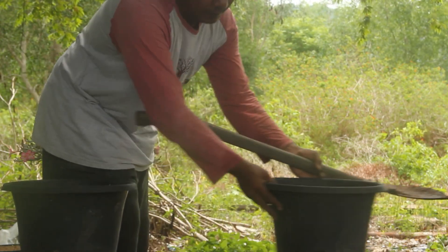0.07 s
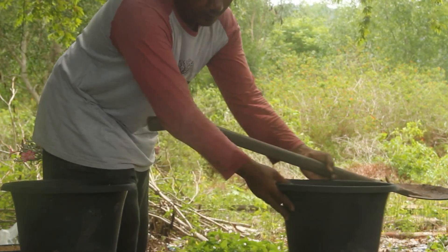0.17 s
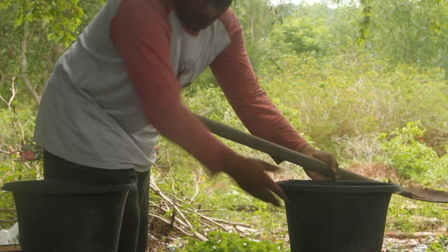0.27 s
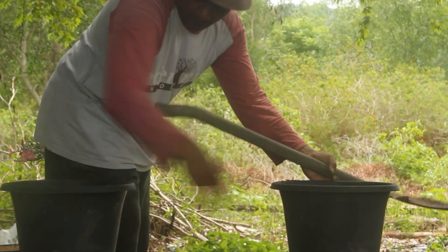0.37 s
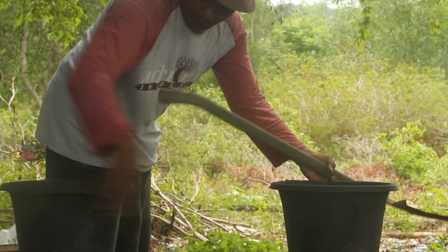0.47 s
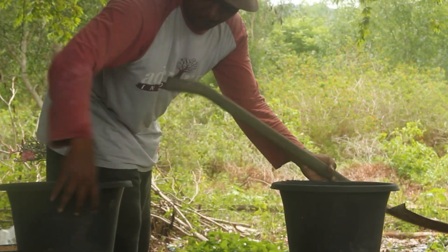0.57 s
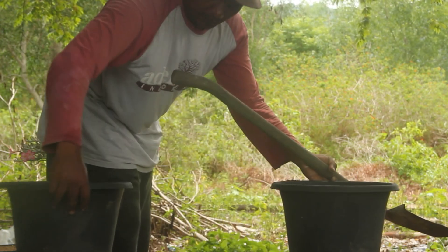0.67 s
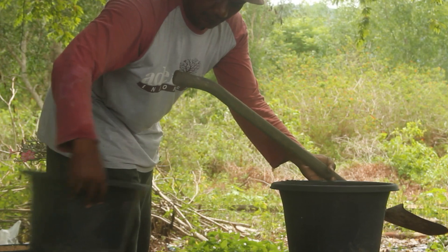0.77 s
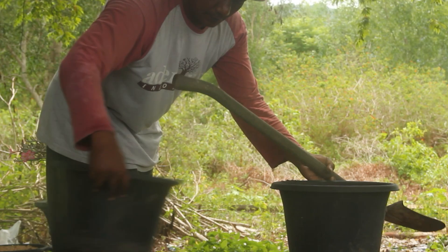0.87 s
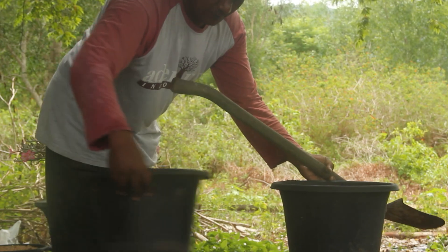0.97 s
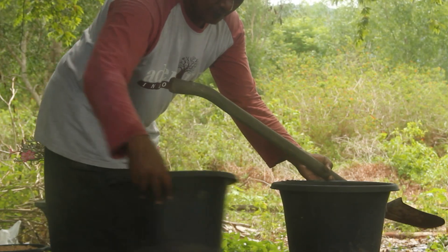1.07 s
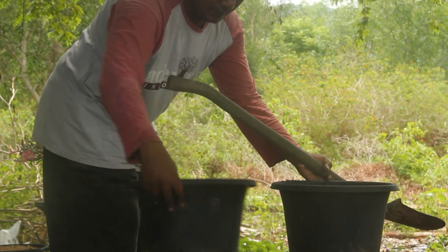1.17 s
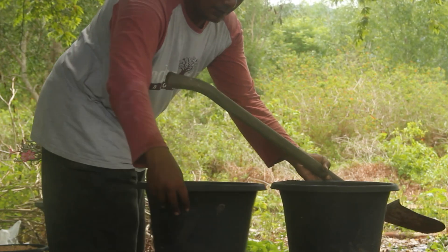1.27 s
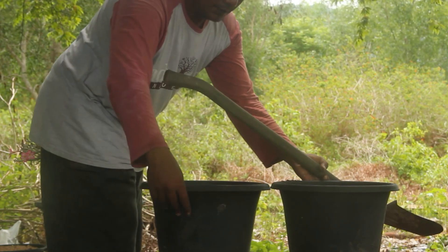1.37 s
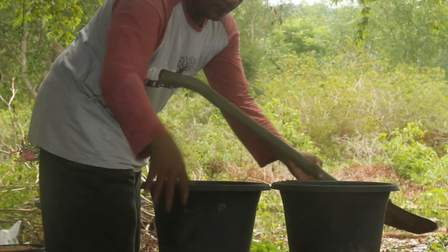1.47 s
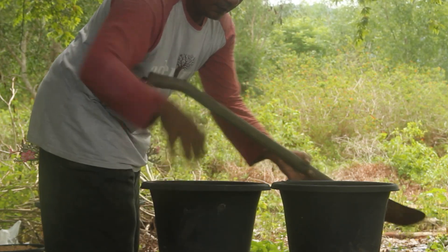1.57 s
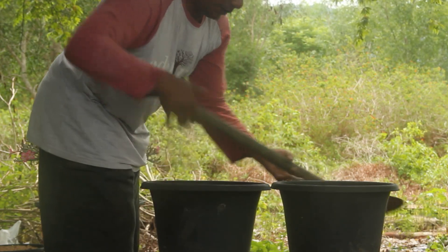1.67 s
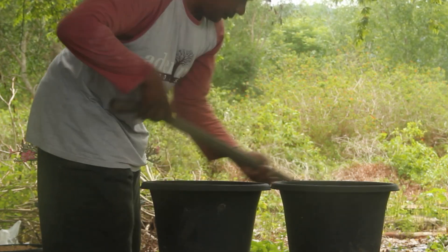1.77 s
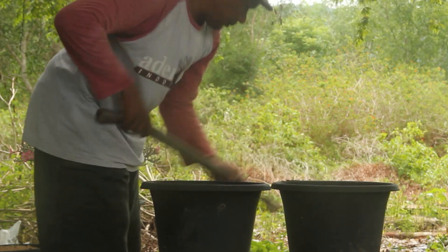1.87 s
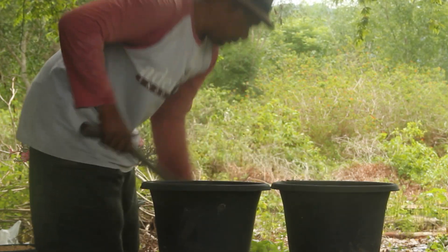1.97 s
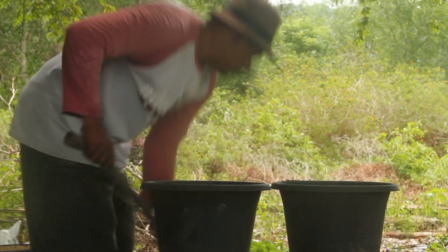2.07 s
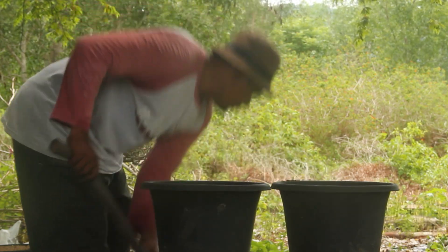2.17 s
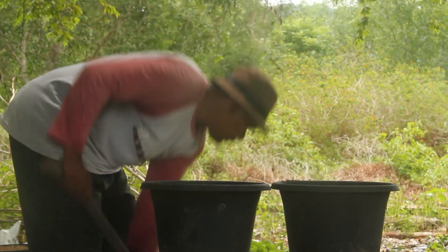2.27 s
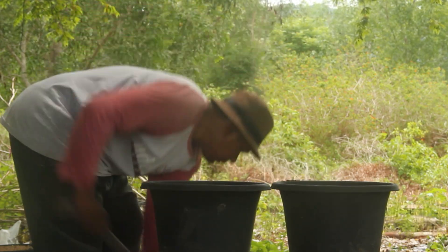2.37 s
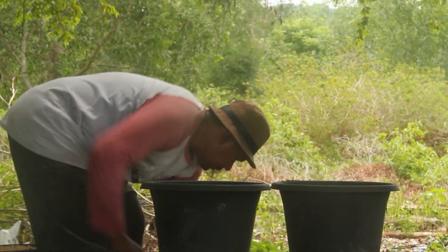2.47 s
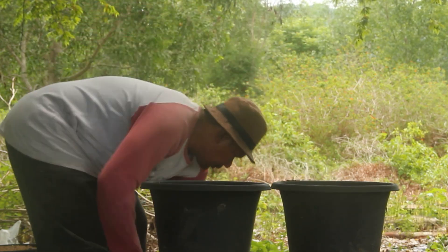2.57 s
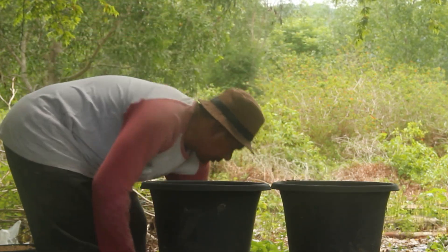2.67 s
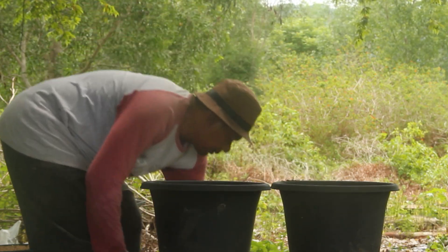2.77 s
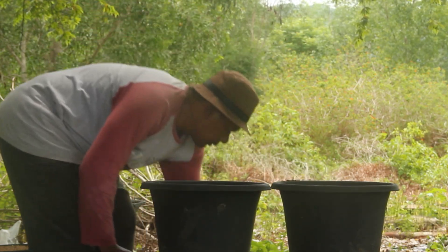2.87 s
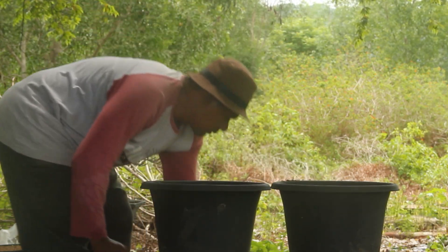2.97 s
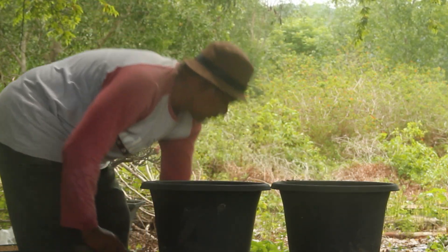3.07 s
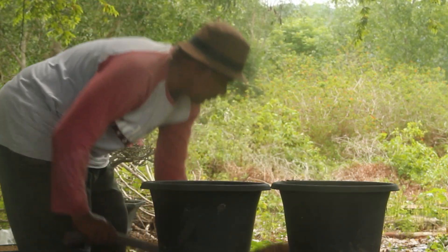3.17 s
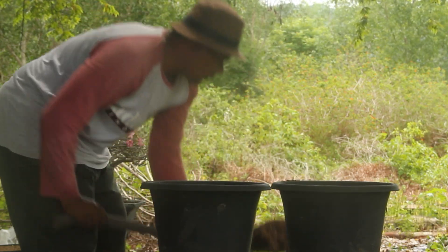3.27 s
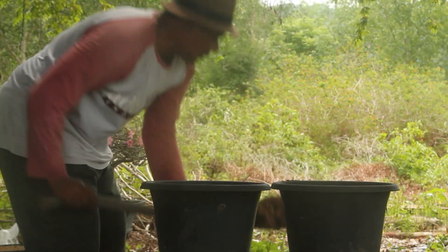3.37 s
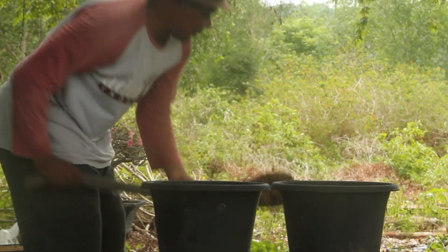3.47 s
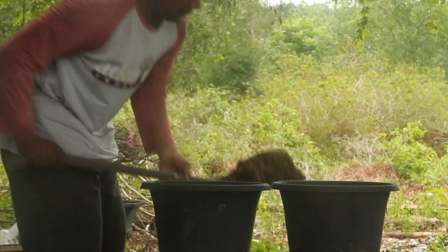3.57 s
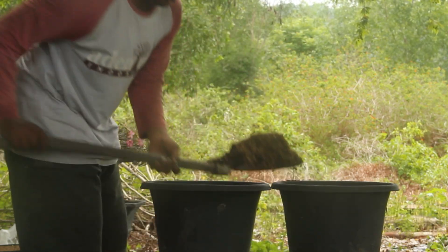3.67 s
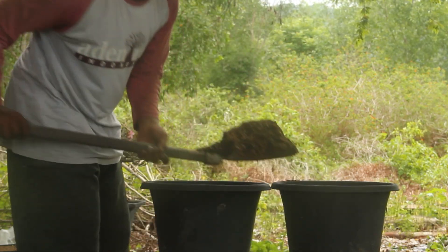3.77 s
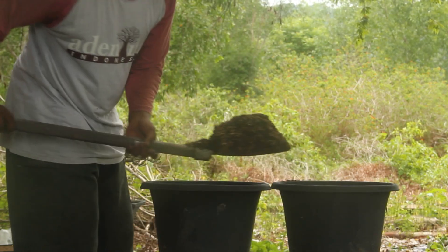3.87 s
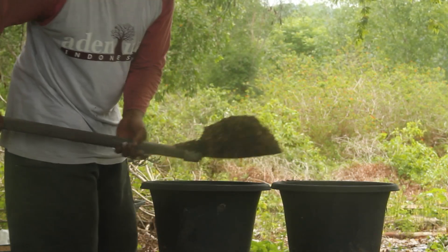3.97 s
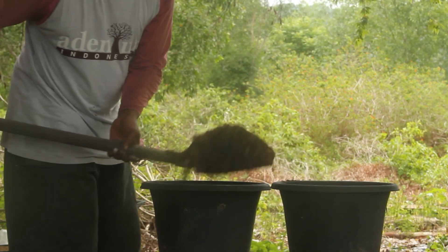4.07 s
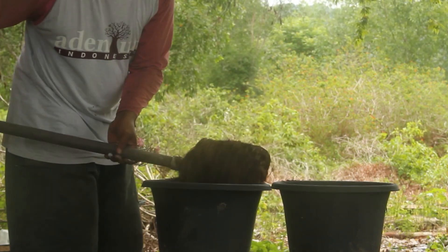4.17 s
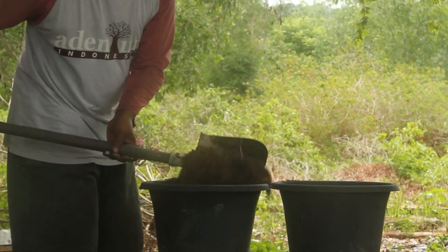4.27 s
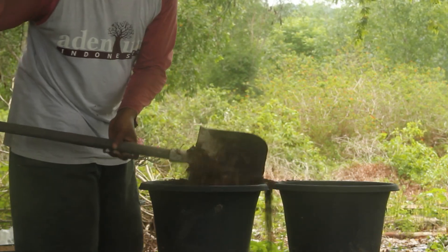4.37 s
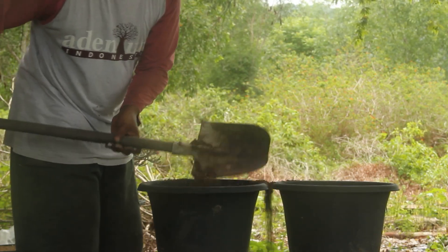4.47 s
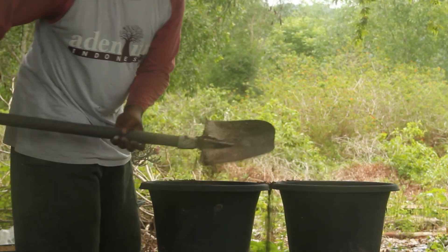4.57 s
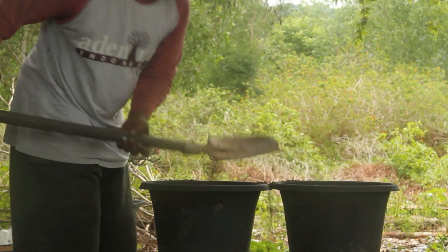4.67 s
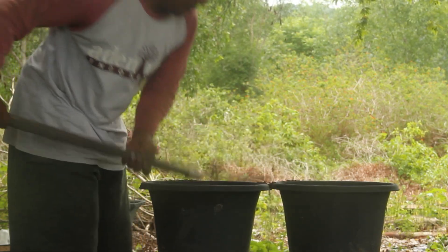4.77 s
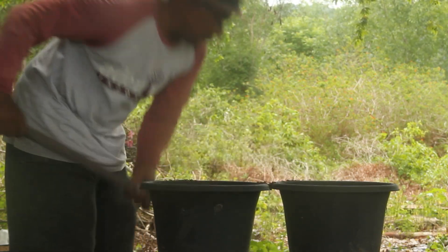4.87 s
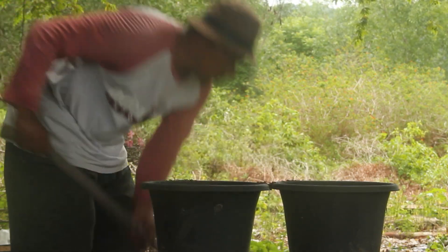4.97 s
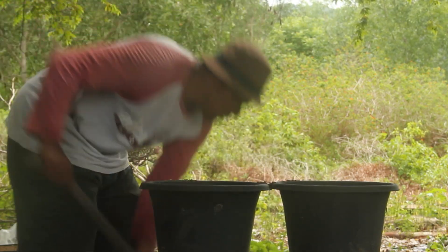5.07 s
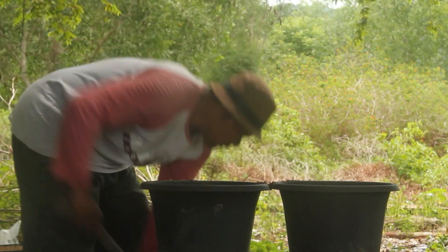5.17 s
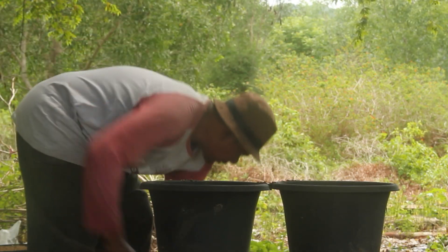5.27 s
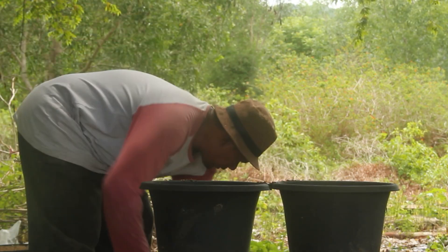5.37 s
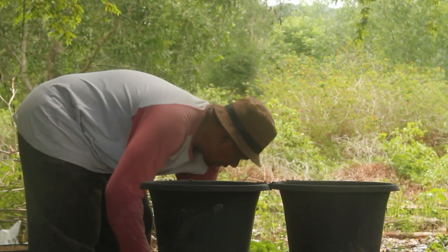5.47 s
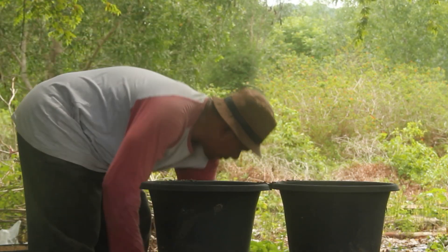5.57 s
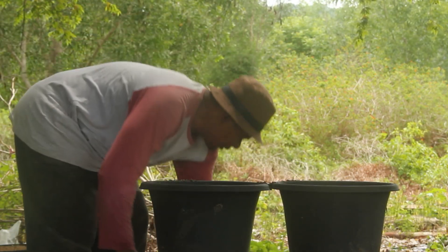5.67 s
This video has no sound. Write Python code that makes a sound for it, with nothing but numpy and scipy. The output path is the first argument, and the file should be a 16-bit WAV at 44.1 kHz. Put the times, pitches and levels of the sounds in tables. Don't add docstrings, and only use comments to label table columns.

```python
import sys
import numpy as np
from scipy import signal
from scipy.io import wavfile
from scipy.ndimage import uniform_filter1d

SR = 44100
rng = np.random.default_rng(int(sys.argv[2]) if len(sys.argv) > 2 else 0)


def pcm_store(signal):
    levels = np.round(np.clip(np.atleast_2d(signal), -1, 1) * 32767)
    wavfile.write(sys.argv[1], SR, levels.astype(np.int16).T)


def linear_from_db(decibels):
    return 10 ** (np.asarray(decibels, float) / 20)


N = 251811
JOLT, PUSH, WITHDRAW = 1.03, 3.65, 5.5


def evened(x):
    return x / np.sqrt(np.mean(x ** 2) + 1e-20)


def read(points, hz):
    f, value = np.transpose(points)
    return np.interp(np.log(hz + 1), np.log(f + 1), value)


def add(mix, s, sound):
    part = mix[round(s * SR):][:len(sound)]
    part += sound[:len(part)]


def causal(gain, size=4096):
    log = np.log(np.maximum(np.r_[gain, gain[-2:0:-1]], 1e-5))
    return np.fft.ifft(np.exp(log - 1j * signal.hilbert(log).imag)).real[:size]


def resonate(x, hz, width_hz):
    turn = np.exp(2j * np.pi * np.cumsum(hz * np.ones(len(x))) / SR)
    r = np.exp(-np.pi * width_hz / SR)
    smooth = signal.lfilter([1 - r], [1, -r], x / turn + 1e-18)
    return 2 * (turn * smooth).real


def wander(length_s):
    width = max(int(length_s * SR), 2)
    drift = uniform_filter1d(rng.standard_normal(N), width)
    return evened(uniform_filter1d(drift, width))


def grit(per_s, spread_db, clump_db, sand):
    struck = rng.random(N) < per_s / SR
    size = np.minimum(rng.exponential(1, N), 3.0)
    sign = rng.choice([-1., 1.], N)
    clicks = evened(sign * linear_from_db(spread_db * size) * struck)
    hiss = sand * rng.standard_normal(N)
    return (clicks + hiss) * linear_from_db(clump_db * wander(0.0032))


def swell(start, attack, fade, db, curve):
    t = np.arange(0, attack + 3 * fade, 1 / SR)
    rising_db = 10 * (1 - t / attack)
    fading_db = 20 * (np.maximum(t - attack, 0) / fade) ** curve
    lost_db = np.where(t < attack, rising_db, fading_db)
    start_ramp = np.minimum(1, t / (0.13 * attack))
    return (linear_from_db(db - lost_db) * start_ramp) ** 2, lost_db


def effort(rows, curve, sand_db, sand_lag):
    power = np.zeros((3, N))
    for start, attack, fade, force_db, weight_db in rows:
        push, lost_db = swell(start, attack, fade, force_db, curve)
        for voice, db in zip(power, [0, weight_db, sand_db - sand_lag * lost_db]):
            add(voice, start, push * linear_from_db(db) ** 2)
    return power


def strokes(power, drive, modes, colour, ring_db):
    hz = np.fft.rfftfreq(8192, 1 / SR)
    peaks = sum(linear_from_db(min(db, 5) / 2) ** 2 / (1 + ((hz - f) / (w / 2)) ** 2) for f, w, db in modes)
    body = linear_from_db(read(colour, hz)) * np.sqrt(1 + linear_from_db(ring_db) ** 2 * peaks)
    low = 1 / (1 + (hz / 1300) ** 8)
    high = 1 / (1 + (5000 / (hz + 1)) ** 8)
    out = np.zeros(N)
    for share, level in zip([1 - low - high, low, high], np.sqrt(power)):
        ring = causal(body * np.sqrt(np.maximum(share, 0)))
        out += signal.oaconvolve(evened(drive) * level, ring / np.linalg.norm(ring))[:N]
    return out


# (start [s], attack [s], time to fade 20 dB [s], grit force [dB], weight of load [dB])
DRAGS = [(0.0, 0.00041, 0.06, -26.5, -6.5), (.036, 0.03, 0.17, -35.5, -6), (.07, .02, 0.15, -40, -1),
         (.113, .004, 0.2, -37.5, 3.5), (.434, 0.04, 0.08, -37, -20), (.525, 0.032, 0.05, -40, -1),
         (.575, 0.012, 0.01, -30.5, -19), (.6, .012, .15, -42, -6), (.651, 0.019, 0.05, -31, -28),
         (.7, 0.025, 0.25, -54, 7), (1.039, 0.0087, 0.06, -39.5, 3), (1.159, 0.0089, 0.08, -36.5, -2),
         (1.19, .015, 0.25, -39.5, -5), (1.243, 0.072, 0.07, -31.5, -3), (1.32, 0.074, 0.11, -34, -26)]
RIM_KNOCK = [(.177, 0.0098, 0.051, -28, -14)]
# (pitch [Hz], width [Hz], level [dB])
EMPTY_POT = [(980, 33, -12), (2220, 530, -5), (6260, 200, -9), (10200, 140, -13), (13500, 140, -8)]
STIFF_RIM = [(2640, 80, -4), (3470, 210, 8), (5950, 160, 1), (9400, 170, -6), (10100, 150, 4),
             (11800, 120, -10), (12600, 250, -11), (13600, 100, -9)]
# (pitch [Hz], level [dB per Hz])
DRAG_COLOUR = [(88, -40), (150, -11), (481, -2), (914, 0), (1490, -7), (8380, -6.5), (9980, -6.5),
               (15600, -7)]


def drag_pots():
    handling = grit(4000., 2.5, 1.5, 0.76)
    drags = effort(DRAGS, JOLT, sand_db=-1.5, sand_lag=0.45)
    knock = effort(RIM_KNOCK, JOLT, sand_db=5.0, sand_lag=0.14)
    walls = strokes(drags, handling, EMPTY_POT, DRAG_COLOUR, ring_db=4.5)
    return walls + strokes(knock, handling, STIFF_RIM, DRAG_COLOUR, ring_db=12.0)


# (start [s], swell [s], time to fade 20 dB [s], level [dB])
CRUMBS = [(0, .001, 0.2751, -33.5), (.2, 0.15, 0.9, -52.5), (1.55, 0.57, 7, -53), (3.5, 0.96, 6.5, -62),
          (4.05, 0.085, 0.77, -42), (4.4, .5, -0.06, -47.5), (5.0, 0.064, 1.5, -53), (4.76, .06, .08, -50),
          (4.87, .02, .14, -49)]
DUST = [(0, .001, 0.25, -52), (.05, 0.021, 0.046, -42), (.43, 0.027, 0.11, -45), (.57, .01, 0.056, -40.5),
        (1.043, .003, 0.04, -44), (.66, .004, .04, -42), (4.8, .04, .05, -56), (1.159, .002, .025, -47),
        (1.29, .012, .03, -39), (1.5, 0.94, .8, -65), (2.443, .002, 0.019, -19), (5.187, .006, .12, -27),
        (5.17, .01, .02, -52), (4.15, .002, 0.014, -40), (2.7, 0.37, 1.1, -52.5), (3.5, 1.3, 0.44, -55),
        (3.97, 0.032, 0.034, -40.5), (4.28, 0.028, .2, -40), (5.4, .31, .5, -58)]
# (pitch [Hz], level [dB per Hz])
SIFT_COLOUR = [
    [(700, -27), (2000, -3), (5000, -1), (9000, -10), (16000, -16.5)],
    [(2000, -25), (7000, -3.5), (12000, -1), (16000, -2.5)],
]


def sift():
    grains = grit(3000., 3.4, 0.68, 1.0) * linear_from_db(1.8 * wander(0.033))
    out = np.zeros(N)
    for rows, rest_db, colour in zip([CRUMBS, DUST], [-86, -75], SIFT_COLOUR):
        power = np.full(N, linear_from_db(rest_db) ** 2)
        for row in rows:
            add(power, row[0], swell(*row, curve=2.3)[0])
        ring = causal(linear_from_db(read(colour, np.fft.rfftfreq(2048, 1 / SR))), size=512)
        out += evened(signal.oaconvolve(grains, ring)[:N]) * np.sqrt(power)
    return out


# (pitch [Hz], level [dB per Hz])
HUM_COLOUR = [(25, -7), (59, -6.5), (113, -2.5), (458, -6.5), (851, -10.5), (1140, -14), (3020, -22),
              (15600, -38.5)]


def hum():
    frames, hz = N // 256 + 5, np.fft.rfftfreq(1024, 1 / SR)
    a, b, patches = rng.standard_normal((frames, 513, 3)).T
    patches = evened(uniform_filter1d(uniform_filter1d(patches, 8, 0), 14, 1))
    z = (a + 1j * b) * linear_from_db(read(HUM_COLOUR, hz)[:, None] + 1.1 * patches)
    return linear_from_db(-44) * evened(signal.istft(z, nperseg=1024, noverlap=768)[1][:N])


# (time [s], peak level [dB], pitch [Hz], time to ring down 60 dB [s])
STONES = [(.793, -32, 2100, .012), (2.075, -32.5, 1960, 0.0082), (2.162, -21, 2900, 0.009),
          (2.163, -26, 1900, 0.01), (2.183, -41, 13500, .004), (2.227, -34.5, 7000, .002),
          (2.333, -5, 2640, .004), (3.96, -27, 1260, 0.031), (4.153, -7, 570, 0.0045),
          (4.166, -14.5, 1160, 0.032), (4.319, -5, 4200, 0.002), (1.966, -40, 3200, .008),
          (5.193, -4, 3900, .003), (5.219, -8, 1500, .004), (5.326, -8, 3000, .004), (5.35, -9, 2100, .005),
          (2.484, -12, 650, .015), (.117, -21, 1000, .012), (1.246, -25, 1170, .012),
          (2.351, -7, 1700, .005), (2.459, -8, 750, .012), (4.353, -11.5, 1060, 0.017),
          (4.377, -12.5, 1290, 0.015), (5.194, -15, 2040, .0058), (5.222, -15, 3190, .009),
          (5.494, -23, 2840, 0.0054)]
SNAPS = [(.007, -39, 2360, .0074), (.056, -21, 13500, 0.006), (.043, -30, 4000, .003),
         (.18, -22, 10200, .005), (.536, -34, 6000, .004), (.666, -25, 12200, .004),
         (.065, -21.5, 3200, .011), (.437, -38, 12000, 0.003), (.58, -35, 12000, .01),
         (.46, -36, 2000, .008), (.654, -23, 3600, .006), (1.163, -17, 2220, 0.0041),
         (1.04, -32, 14000, .003), (1.048, -20, 13900, .004), (1.164, -24, 14500, .006),
         (1.246, -32, 10100, .003), (1.279, -32, 7000, .003), (1.288, -28, 10500, .003),
         (1.305, -23, 8040, .005), (1.306, -26, 13000, .004), (2.637, -17, 2750, .006),
         (2.137, -40, 11000, 0.0031), (2.304, -13.5, 7900, 0.01), (2.446, -7.5, 9050, 0.0035),
         (3.655, -41, 12000, .004), (3.8, -47, 3000, .005), (4.185, -12.5, 2440, 0.0067),
         (5.437, -11, 2950, 0.012), (5.522, -26, 2900, .005), (5.588, -29, 1800, 0.0072)]


def ticks():
    out, t = np.zeros(N), np.arange(1500) / SR
    for rows, crack_db in [(STONES, -18), (SNAPS, -6.5)]:
        noise = rng.standard_normal((len(rows), len(t)))
        for (s, db, hz, t60), n in zip(rows, noise):
            ring = np.sin(2 * np.pi * hz * t) * linear_from_db(-60 * t / max(t60, .002))
            crack = (n + 2.7 * (t == 0)) * linear_from_db(crack_db - 60 * t / 0.0015)
            add(out, s, linear_from_db(db) * (ring + crack))
    return out


# (start [s], length [s], pitch [Hz], width [Hz], level
# [dB])
RUBS = [(.116, 0.026, 1000, 400, -24), (1.042, 0.051, 200, 150, -35.5), (1.166, 0.026, 2250, 600, -30.5),
        (1.245, 0.026, 1170, 350, -27), (1.283, 0.031, 1150, 400, -31), (1.32, .11, 8400, 400, -42),
        (1.33, 0.031, 4800, 500, -43), (1.36, 0.075, 4700, 1200, -30), (2.303, 0.022, 5200, 204, -20),
        (2.332, 0.06, 2630, 90, -15), (2.35, 0.03, 1300, 150, -19), (2.375, 0.046, 403, 122, -20.5),
        (2.455, 0.025, 720, 200, -21), (4.148, 0.026, 187, 102, -23), (4.156, 0.015, 1160, 200, -25),
        (4.261, 0.11, 330, 119, -29.5), (4.25, .06, 1120, 402, -27), (4.339, 0.035, 1170, 600, -24),
        (5.189, 0.05, 5280, 300, -19), (5.226, 0.085, 3540, 400, -20), (5.208, 0.03, 820, 120, -19),
        (1.325, .05, 4700, 300, -29), (1.315, .025, 3950, 250, -29), (1.41, .08, 5400, 400, -44),
        (4.27, .07, 190, 80, -31), (1.335, .04, 4350, 300, -27), (1.352, .03, 3850, 300, -28),
        (1.362, .028, 3150, 300, -26), (1.31, .025, 1150, 250, -31), (4.276, .02, 300, 150, -24),
        (4.184, .018, 350, 200, -28), (4.32, .03, 2900, 600, -28), (.178, .04, 10200, 300, -30),
        (.194, .045, 6100, 250, -32), (.058, .035, 12800, 900, -34), (.085, .03, 3300, 400, -33),
        (2.303, .03, 2550, 250, -26), (2.303, .03, 1500, 300, -28), (2.35, .05, 1680, 90, -21),
               (2.38, .03, 1270, 90, -19), (2.39, .06, 560, 90, -23), (2.4, .06, 2110, 60, -27),
               (2.44, .05, 3460, 100, -24), (2.478, .05, 600, 150, -21), (2.505, .03, 830, 150, -27),
               (2.5, .025, 2900, 300, -25), (2.43, .05, 330, 120, -24), (2.445, .02, 5300, 500, -21),
               (2.375, .04, 2500, 500, -21), (2.53, .06, 3000, 700, -24), (2.55, .05, 760, 150, -26),
               (2.62, .045, 2800, 500, -30), (5.19, .02, 3900, 250, -18), (5.19, .04, 1980, 120, -20),
               (5.19, .02, 800, 250, -20), (5.212, .02, 2900, 300, -20), (5.215, .02, 420, 120, -26),
               (5.24, .04, 5370, 150, -23), (5.23, .07, 1680, 70, -24), (5.275, .045, 830, 120, -20),
               (5.275, .04, 2850, 250, -20), (5.3, .06, 3600, 400, -19), (5.33, .06, 2110, 200, -21),
               (5.333, .02, 834, 120, -23), (5.37, .03, 850, 120, -24), (5.408, .025, 830, 150, -30),
               (5.188, .05, 7700, 500, -23), (5.435, .01, 9200, 700, -29), (5.39, .04, 2110, 150, -28),
               (5.33, .05, 4360, 150, -26), (4.436, .04, 2700, 200, -20), (4.457, .022, 2200, 200, -24),
               (4.436, .03, 3750, 150, -23)]


def rubs():
    out, rows = np.zeros(N), RUBS
    noise = rng.standard_normal((len(rows), 8000))
    for (s, length, hz, width_hz, db), n in zip(rows, noise):
        u = np.arange(0, length, 1 / SR) / length
        tone = evened(resonate(resonate(n, hz, width_hz), hz, width_hz))[2000:][:len(u)]
        swing = np.sqrt(uniform_filter1d(tone ** 2, size=300) + 1e-9)
        tone = tone / (0.4 + swing) * 1.4
        ends = np.minimum(1, np.minimum(u / 0.07, (1 - u) / 0.19))
        add(out, s, linear_from_db(db - 11.2 * u) * ends * tone)
    return out


# (start [s], length [s], start pitch [Hz], end pitch [Hz], level [dB])
GLIDES = [(.69, .06, 3050, 2780, -49), (.735, .095, 2780, 2680, -51), (2.063, .035, 2300, 2450, -53),
          (2.095, .012, 2550, 2850, -52), (2.105, .022, 2850, 2350, -52), (2.005, .025, 2300, 2550, -57),
          (2.025, .025, 2800, 2400, -57), (3.01, .045, 2850, 2950, -53), (3.05, .06, 2700, 2400, -55),
          (.32, .11, 7250, 6850, -59), (.3, .13, 5100, 5200, -63), (.27, .17, 11600, 11950, -65),
          (.27, .065, 13700, 14400, -63)]
# (time [s], pitch [Hz], level [dB])
WARBLE = [(1.52, 2400, -57), (1.572, 2900, -48), (1.598, 1680, -54), (1.615, 2350, -47), (1.645, 2620, -48),
          (1.665, 2350, -62), (1.685, 2500, -53), (1.715, 2570, -60), (1.79, 2500, -62)]


def whistles():
    out, quaver, flutter_db = np.zeros(N), 0.013 * wander(0.0027), 3.5 * wander(.008)
    glides = [[(s, a, db), (s + length, b, db - 3)] for s, length, a, b, db in GLIDES]
    for rows in [WARBLE] + glides:
        s, hz, db = np.transpose(rows)
        t = np.arange(s[0], s[-1], 1 / SR)
        at = (t * SR).astype(int)
        pitch = uniform_filter1d(np.interp(t, s, hz), 300) + np.sqrt(2500 * hz.mean()) * quaver[at]
        tone = np.sqrt(2) * np.sin(2 * np.pi * np.cumsum(pitch) / SR)
        level = linear_from_db(np.interp(t, s, db) + flutter_db[at])
        add(out, s[0], tone * level * signal.windows.tukey(len(t), .4))
    return out


# (time [s], level [dB], resonance [Hz])
SQUEAL = [
    (1.301, -52, 3680),
    (1.325, -30.5, 4030),
    (1.346, -26, 4370),
    (1.358, -25, 4350),
    (1.367, -25, 3450),
    (1.374, -18, 2600),
    (1.401, -17, 2550),
    (1.45, -33.5, 2500),
    (1.5, -55, 2660),
]


def squeal():
    s, db, hz = np.transpose(SQUEAL)
    t = np.arange(s[0], s[-1], 1 / SR)
    pitch, noise = np.interp(t, s, hz), rng.standard_normal(len(t))
    width_hz = 89.0 + .11 * pitch.mean()
    tone = evened(resonate(resonate(noise, pitch, width_hz), pitch, width_hz))
    out = np.zeros(N)
    add(out, s[0], linear_from_db(np.interp(t, s, db)) * tone)
    return out


# (start [s], attack [s], time to fade 20 dB [s], grit force [dB], weight of load [dB])
DIGS = [
    (2.331, 0.006, 0.16, -17.5, -7.5),
    (2.42, 0.022, 0.23, -21.5, -3.5),
    (5.185, 0.01, .28, -16, -8.5),
]
BITES = [(2.3027, 0.0008, 0.2, -22.5, -16), (2.445, 0.0015, 0.05, -21.5, 0),
         (5.188, 0.006, 0.019, -18, -2.5), (5.172, .012, .01, -42, -5), (2.6, .02, .07, -33, -6),
         (5.431, .004, 0.048, -27, -21), (5.48, .02, 0.28, -42, -8), (5.572, 0.01, .12, -45.5, -1)]
# (pitch [Hz], width [Hz], level [dB])
BURIED_BLADE = [(404, 24, -1.5), (564, 23, 1), (820, 90, -5), (1280, 160, -6), (1680, 45, 0),
                (2110, 70, -4), (2480, 35, -2), (2830, 80, -3), (3490, 110, -5), (4340, 120, -8),
                (5260, 170, -5), (7390, 57, 0), (7900, 96, -11), (8680, 140, -10)]
# (pitch [Hz], level [dB per Hz])
DIG_COLOUR = [(88, -46), (150, -15), (404, -1), (880, -3), (1700, -2.5), (1840, -2), (2560, 3.5),
              (15600, -11.5)]


def dig():
    power = effort(DIGS, PUSH, sand_db=-3.0, sand_lag=0.9)
    power += effort(BITES, JOLT, sand_db=-4.0, sand_lag=0.28)
    return strokes(power, grit(4500., 5.0, 0.8, 0.8), BURIED_BLADE, DIG_COLOUR, ring_db=8.0)


# (start [s], attack [s], time to fade 20 dB [s], grit force [dB], weight [dB])
LIFTS = [(2.69, 0.089, .16, -29, -14)]
SHAKE = [(4.433, 0.0026, 0.063, -19, -10), (4.435, 0.022, 0.06, -17.5, -9)]
# (pitch [Hz], width [Hz], level [dB])
FREE_BLADE = [(2136, 61, -8), (2640, 41, -6), (2940, 64, 0.5), (3330, 66, -18), (3770, 44, 17),
              (4530, 76, -12), (4780, 150, -3), (5200, 34, 9), (5750, 42, 8)]
# (pitch [Hz], level [dB per Hz])
LIFT_COLOUR = [(120, -48), (200, -14), (430, -8), (535, -12), (757, -4.5), (1050, -5), (2220, 2.5),
               (15600, -9)]


def lift_and_shake():
    power = effort(LIFTS, WITHDRAW, sand_db=-2.5, sand_lag=.05)
    power += effort(SHAKE, JOLT, sand_db=-1.5, sand_lag=.02)
    return strokes(power, grit(5500.0, 3.9, 0.16, 3.0), FREE_BLADE, LIFT_COLOUR, ring_db=6.)


# (start [s], attack [s], time to fade 20 dB [s], grit force [dB], weight of load [dB])
POURS = [(3.94, 0.038, 0.12, -39, -0.5), (4.04, .008, 0.18, -42, -5), (4.149, 0.0047, .06, -29, 9),
         (4.16, 0.037, 0.066, -34, 1.5), (4.249, 0.0079, 0.18, -33, -6), (4.265, 0.018, 0.086, -33, 7.5),
         (4.29, 0.039, 0.074, -25, -2), (4.34, 0.035, 0.31, -34.5, -8), (4.555, .01, .2, -47, -4),
         (4.581, 0.0026, 0.1, -34.5, -10), (4.652, 0.0083, 0.065, -39.5, -2)]
# (pitch [Hz], width [Hz], level [dB])
FILLING_POT = [(176, 50, 2), (330, 54, 3.5), (603, 130, -8), (920, 82, 2), (1190, 200, -13),
               (2670, 270, -6)]
# (pitch [Hz], level [dB per Hz])
POUR_COLOUR = [(70, -33), (110, -10), (170, -4.5), (340, -0.5), (1150, -6.5), (1500, -9), (2500, -9),
               (16000, -22)]


def pour():
    power = effort(POURS, JOLT, sand_db=-4.5, sand_lag=.02)
    return strokes(power, grit(4000., 3.1, 2.2, 1.4), FILLING_POT, POUR_COLOUR, ring_db=1.5)


def roaming(x, patchy_db, size):
    z = signal.stft(x, nperseg=size, noverlap=size * 3 // 4)[2]
    patches = rng.standard_normal(z.shape[::-1]).T
    for _ in range(2):
        patches = uniform_filter1d(patches, size=2, axis=0)
        patches = uniform_filter1d(patches, size=5632 // size, axis=1)
    gain = linear_from_db(patchy_db * evened(patches))
    return signal.istft(z * evened(gain), nperseg=size, noverlap=size * 3 // 4)[1][:N]


def yard(x):
    taps, at = np.zeros(8000), np.arange(100, 7900, 22)
    taps[at + rng.integers(0, 22, len(at))] = rng.choice([-1., 1.], len(at))
    taps *= linear_from_db(-60 * np.arange(8000) / SR / 0.2)
    return signal.oaconvolve(x, taps / np.linalg.norm(taps))[:N]


def scene():
    near = drag_pots() + dig() + pour()
    near = roaming(near, patchy_db=1.5, size=256)
    near = roaming(near, patchy_db=1.8, size=512)
    near += lift_and_shake() + rubs() + squeal() + whistles()
    stones = ticks()
    close = (near + linear_from_db(-6.5) * yard(near) + stones + linear_from_db(-10.5) * yard(stones))[None]
    small = signal.sosfilt(signal.butter(3, 130., "high", fs=SR, output="sos"), close)
    return small + hum() + sift()


def roll_off(x):
    return signal.sosfilt(signal.butter(12, 16790, fs=SR, output="sos"), x)


def record(dry):
    thin = signal.sosfilt(signal.butter(3, 50., "high", fs=SR, output="sos"), dry)
    dulled = signal.sosfilt(signal.butter(4, 15300., fs=SR, output="sos"), thin)
    held = 1.5 * np.tanh(dulled / 1.5)
    band_limit = signal.firwin(801, 15820, window=("kaiser", 9), fs=SR)
    limited = signal.oaconvolve(held, band_limit[None], "same")
    return roll_off(limited)


dry = scene()
out = record(dry)
pcm_store(out)
```